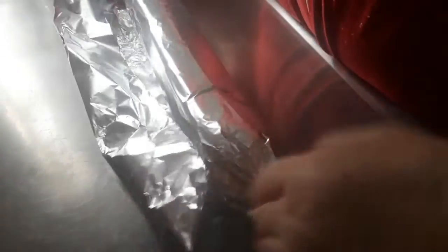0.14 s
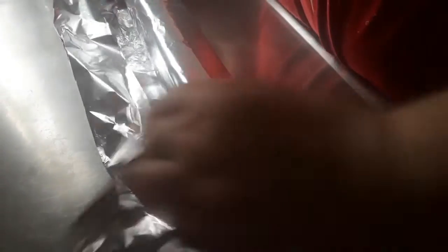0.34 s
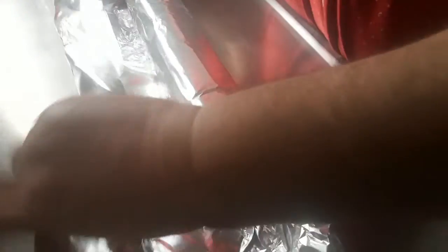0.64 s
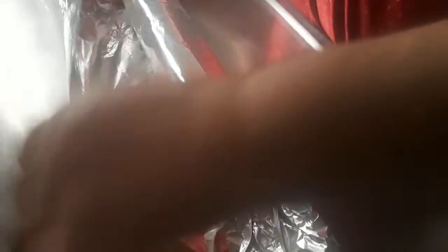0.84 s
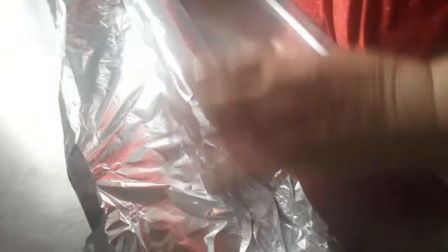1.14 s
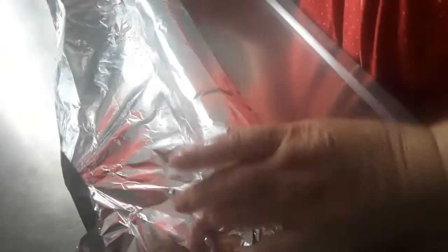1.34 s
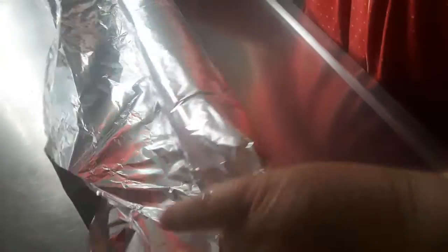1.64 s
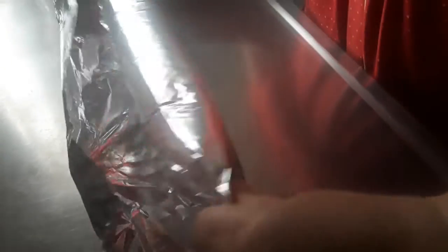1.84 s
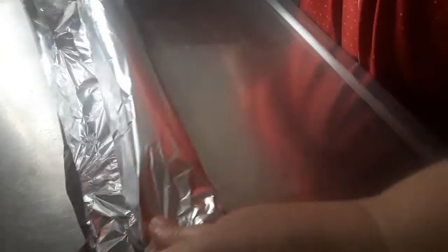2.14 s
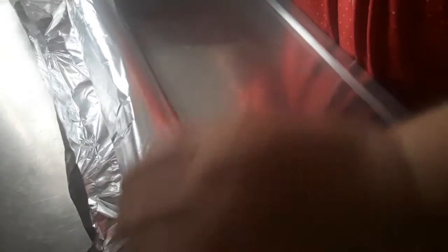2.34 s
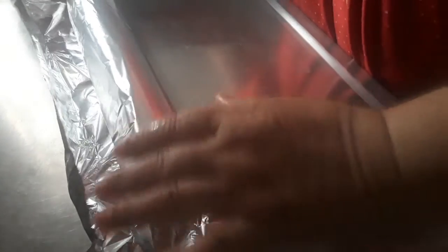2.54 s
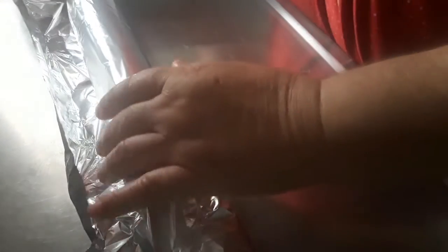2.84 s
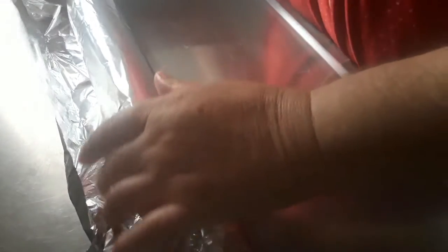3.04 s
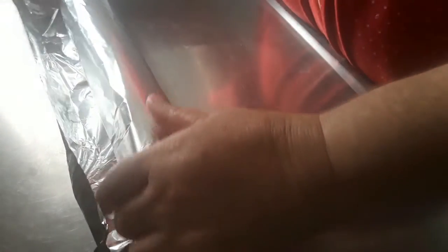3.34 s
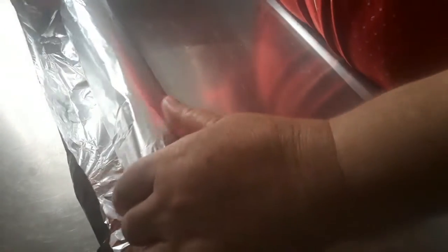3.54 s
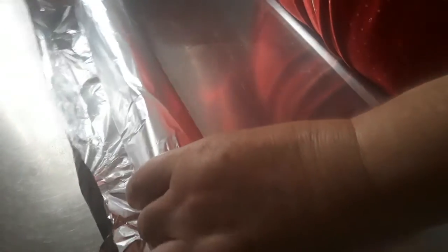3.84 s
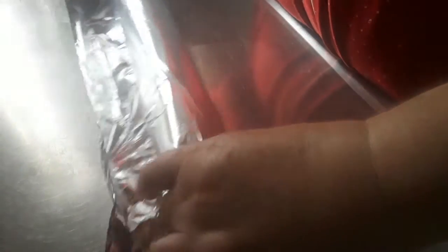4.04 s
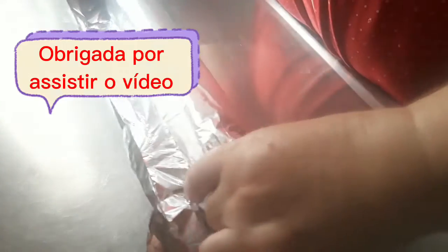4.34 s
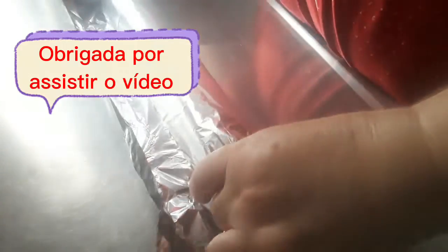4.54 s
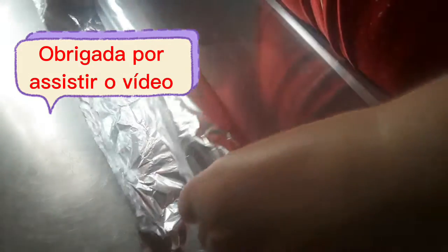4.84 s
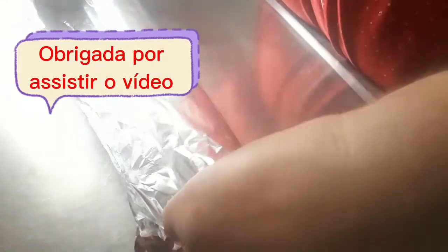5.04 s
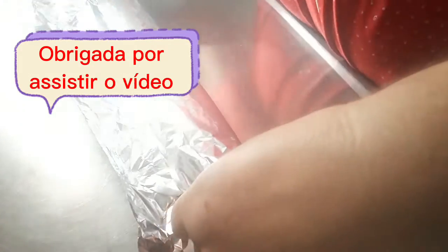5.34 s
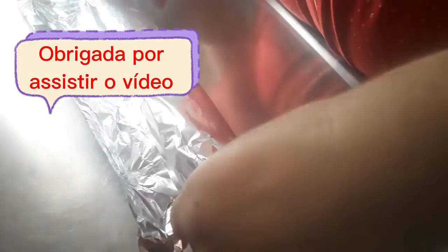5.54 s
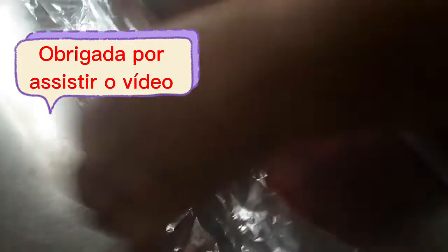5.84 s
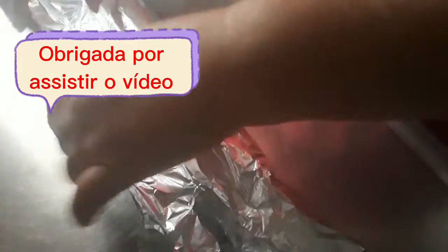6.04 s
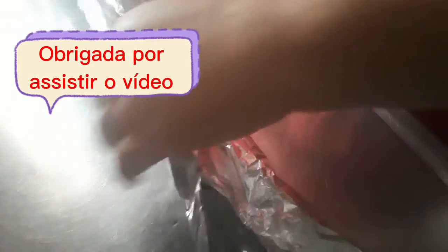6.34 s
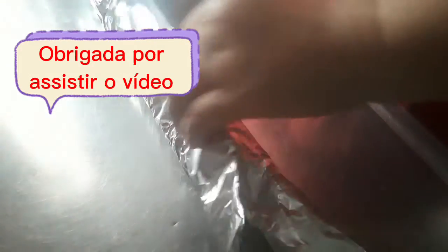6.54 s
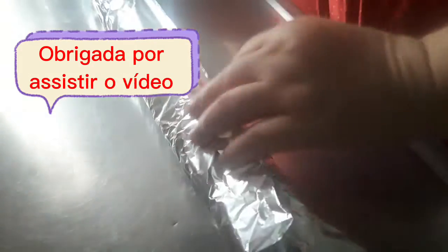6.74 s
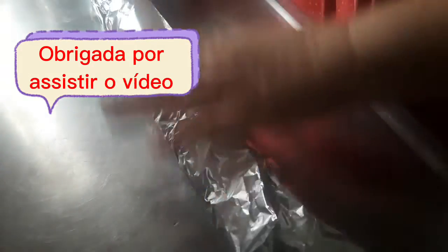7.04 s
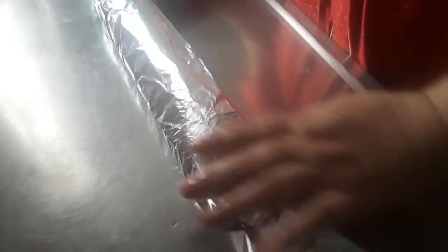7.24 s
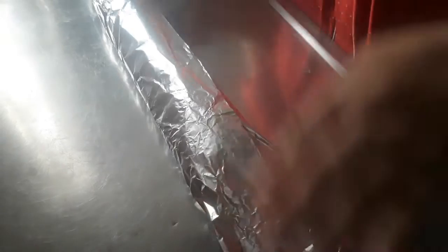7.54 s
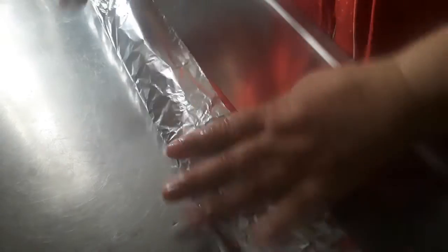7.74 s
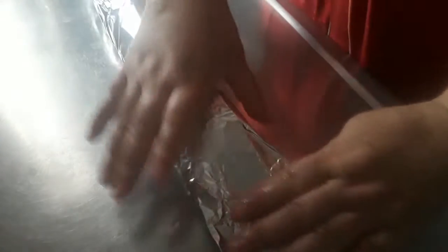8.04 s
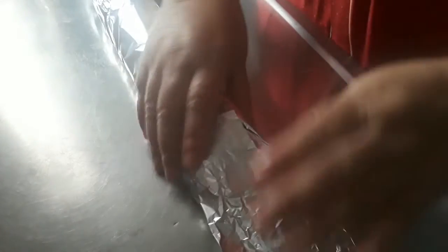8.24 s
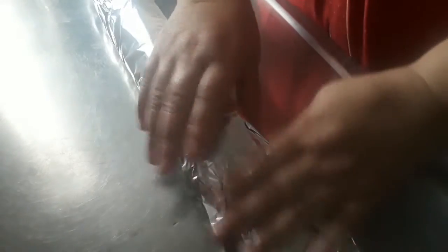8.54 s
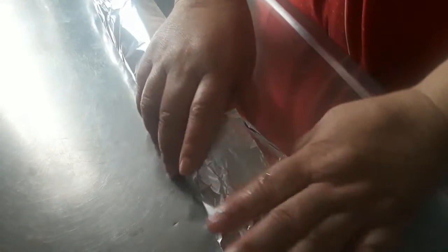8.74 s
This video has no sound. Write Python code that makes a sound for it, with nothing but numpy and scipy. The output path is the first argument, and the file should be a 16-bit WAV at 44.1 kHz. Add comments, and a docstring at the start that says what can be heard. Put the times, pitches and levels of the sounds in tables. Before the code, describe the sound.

Foil crinkles from the first moment, quickly bursting into loud, sharp crackle as creases collapse. Smaller, lower folding and pressing follows, with random tiny snaps and an occasional soft pat on the parcel. Later the crushing grows strong again, with thumps that make the metal counter ring briefly and short scraping rubs. Recorded close on a small microphone with little bass, in a small reflective kitchen with quiet room noise.

```python
"""Two hands fold and press aluminium foil around food on a steel kitchen counter, close by.
From the start, squeezes make tiny facets buckle in clumps over a faint hush, with lesser snaps at random.
Creases soon give way in bursts of small buckles, loudest in the first second and again in the second half.
From 0.4 s the palm pats the parcel, thudding into the ringing counter; from 2.8 s it also rubs the foil.
From 3.9 s a few chosen sharp snaps join in. The small kitchen briefly echoes every foil and hand sound."""
import sys
import numpy as np
from scipy import signal
from scipy.fft import rfft, irfft, next_fast_len
from scipy.io import wavfile
from scipy.ndimage import uniform_filter1d

SR = 44100
rng = np.random.default_rng(int(sys.argv[2]) if len(sys.argv) > 2 else 0)


def generate_wav(sig):
    """Save sig (samples, or channels by samples) to the path in sys.argv[1] as 16-bit PCM at SR."""
    pcm = np.round(np.clip(np.atleast_2d(sig).T, -1, 1) * 32767).astype(np.int16)
    wavfile.write(sys.argv[1], SR, pcm)


N = 392490
TIME = np.arange(N) / SR

# Levels in the tables are relative: each sound function also applies its own overall gain.
# Faint noise of the still room: (frequency [Hz], level [dB])
HUSH_COLOUR = [(25, 13), (60, 8), (150, 8), (400, 0.5), (1500, 2.5), (6000, 4), (10000, -11), (16000, -30)]
# Squeezes and strokes of the hands: (time [s], length [s], force [dB], change of force by the end [dB],
# pressing on the parcel [dB], fineness [dB]: low = broad folds, high = small wrinkles)
SQUEEZES = [(-.039, .25, -27.5, 1, -19, -2), (.258, .17, -23.5, 2, -22, -1), (.485, .14, -27, 6, -16, -3.5),
            (.653, .14, -21, 3, -17.5, 0), (.838, 0.23, -24.5, -7.5, -20.5, 0.5),
            (1.286, 0.065, -25.5, -0.5, -22, 1.5), (1.404, 0.45, -30, 5, -18.5, -1.5),
            (1.918, .15, -27.5, 6.5, -20.5, 0), (2.076, .24, -25.5, -2, -17.5, -2.5),
            (2.378, .13, -28.5, -6, -19, -2.5), (2.549, .15, -26, -6, -15, -5.5),
            (2.728, 0.33, -30, -3.5, -17, -3.5), (3.03, 0.29, -33.5, 6, -16.5, -1.5),
            (3.236, .33, -31, 2, -14, -4), (3.615, .36, -30, 3, -15, -5), (4.007, .15, -28.5, 5, -20, -1),
            (4.198, .22, -25.5, -0.5, -11.5, -4.5), (4.497, .36, -27, 2.5, -17, -1.5),
            (4.882, .28, -27, 2.5, -18, -2), (5.249, 0.33, -24.5, -10.5, -16.5, -2),
            (5.607, .32, -25.5, -10, -15, -1.5), (6.081, .15, -25, -1, -15, -3),
            (6.23, 0.32, -20, -7, -14.5, 1.5), (6.557, .43, -22, -7.5, -17, .5),
            (7.092, .33, -23, 0, -15, -1.5), (7.473, .06, -24.5, -5, -20, -1.5),
            (7.76, 0.026, -22.5, -1.5, -11, -2), (7.867, .31, -29.5, 1.5, -11.5, -2),
            (8.244, .16, -28, -4, -19.5, 2.5), (8.517, 0.27, -26, -6, -16.5, -1.5),
            (8.778, 0.11, -29, 3, -18, -2)]
# Colour of the foil's crackle: (frequency [Hz], level [dB])
FOIL_COLOUR = [(470, -45.5), (800, -5), (883, -14), (1400, -6.5), (1840, -6), (2730, -4.5), (4770, 0.5),
               (6510, -1.5), (7740, 1.5), (9920, -11), (14200, -3), (15500, -7.5)]
# Colour of the parcel and counter under the foil: (frequency [Hz], level [dB])
PARCEL_COLOUR = [(30, -14), (60, -37), (100, -10), (130, -17), (155, 0), (185, -18.5), (270, -9),
                 (420, 3.5), (630, -3), (725, 2.5), (850, -4), (1100, 4)]
# The sharpest single facets snapping through: (time [s], level [dB], pitch [Hz])
SNAPS = [(3.9344, -11, 2750), (4.007, -17, 7620), (4.212, -11.5, 5350), (5.3727, -14, 6050),
         (5.4068, -16, 5160), (5.47, -15.5, 5060), (7.714, -24, 7560), (8.4968, -19, 5030)]
# Large creases giving way: (time [s], level [dB], pitch of the largest facet [Hz])
CREASES = [(0.197, -7, 5000), (0.26, -6, 5270), (0.407, -1, 6700), (0.492, -4, 8200), (0.544, 0.5, 4300),
           (0.6, -4, 7600), (0.6904, -9, 5300), (0.767, -6, 7520), (0.796, 1.5, 7600), (0.822, 2.5, 7600),
           (1.062, -11.5, 4200), (1.225, -15, 6940), (1.259, -16.5, 7700), (1.318, -8, 4930),
           (1.501, -11, 4120), (1.609, -9.5, 7630), (1.885, -10, 5450), (2.417, -13.5, 2750),
           (2.612, -13, 4850), (2.734, -13.5, 6500), (2.755, -10.5, 2470), (2.904, -11.0, 4160),
           (3.079, -15.0, 2600), (3.138, -13.5, 6060), (3.19, -12, 5500), (3.293, -14, 2200),
           (3.372, -9, 4770), (3.4752, -11, 4940), (3.579, -16.5, 2110), (3.854, -10, 5540),
           (4.346, -11.5, 1500), (4.795, -5.5, 4500), (5.272, -11.5, 3180), (5.47, -12.5, 5030),
           (5.505, -10.5, 4930), (5.852, -6, 1900), (6.097, -12, 5340), (6.255, -5, 8200),
           (6.9085, -10.0, 4660), (7.089, -10.5, 7300), (7.124, -6.5, 4600), (7.163, -9.5, 1740),
           (7.63, -19.5, 4860), (7.657, -16.5, 3460), (7.769, -1.5, 7130), (7.89, -8.5, 8000),
           (8.01, -6.5, 5200), (8.231, -10.5, 6900), (8.317, -10.5, 7860), (8.786, -12.5, 5615),
           (8.856, -2.5, 5100)]
# The hand landing on the parcel: (time [s], level [dB], length of the push [s], pitch of the hollow [Hz])
PATS = [(.429, -27, 0.03, 424), (.719, -22, 0.011, 438), (.993, -32, 0.023, 200),
        (1.062, -31.5, 0.015, 216), (1.501, -31, 0.014, 160), (2.755, -31, 0.01, 432),
        (3.367, -28.5, .0054, 420), (4.234, -21, 0.0043, 720), (4.267, -21, .007, 600),
        (6.256, -22, .012, 430), (6.352, -22.5, 0.018, 424), (7.113, -23.5, 0.0048, 140),
        (7.312, -27.5, 0.01, 406), (7.783, -20.5, .013, 340), (8.555, -26.5, 0.0097, 322),
        (8.697, -39, 0.0071, 158), (8.852, -26, .016, 143)]
# Ringing of the counter: (frequency [Hz], level [dB], time to fade by 60 dB [s])
COUNTER_MODES = [(112, -20, 0.091), (157.7, 8, 0.29), (308, -4, 0.55), (427, 4, 0.12), (769, 10.5, 0.053)]
# The palm sliding over the foil: (time [s], length [s], level [dB], resonance of the air pocket [Hz])
RUBS = [(2.81, 0.077, -46.5, 1000), (4.225, 0.18, -44, 1420), (6.1, 0.082, -37, 1850),
        (7.118, 0.3, -37.5, 1630), (8.844, 0.064, -32, 1390)]
# How long the kitchen rings: (frequency [Hz], time to fade by 60 dB [s])
KITCHEN_FADE = [(200, 0.32), (530, 0.26), (1400, 0.3), (4000, 0.39), (10000, 0.18), (16000, 0.12)]


def amp(db):
    """Turns decibels into a gain."""
    return 10 ** (np.asarray(db) / 20)


def evened(x):
    """Scales a signal to an rms (average strength) of 1."""
    return x / np.sqrt(np.mean(x ** 2) + 1e-20)


def read(points, hz):
    """Reads a table between its points, on a log-frequency axis."""
    f, value = np.transpose(points)
    return np.interp(np.log(hz + 1), np.log(f), value)


def add(mix, s, sound):
    """Lays a sound into the mix at time s."""
    part = mix[max(round(s * SR), 0):][:len(sound)]
    part += sound[:len(part)]


def colour(x, points, size=4096):
    """Filters to the given spectrum without sounding early, so that clicks keep their sharp fronts."""
    log_gain = np.log(amp(read(points, abs(np.fft.fftfreq(size, 1 / SR)))))
    # this turns the wanted loudness curve into a minimum-phase filter
    taps = np.fft.ifft(np.exp(np.conj(signal.hilbert(log_gain)))).real
    return signal.oaconvolve(x, taps[:size // 2])[:len(x)]


def split(x, edges_hz, order=8):
    """Cuts a sound into adjoining bands, each at rms 1."""
    size = next_fast_len(N)
    spectrum, hz = rfft(x, size), np.fft.rfftfreq(size, 1 / SR)
    lowpasses = [1 / (1 + (hz / edge) ** order) for edge in edges_hz]
    below = [0 * hz] + lowpasses + [0 * hz + 1]
    return [evened(irfft(spectrum * band, size)[:N]) for band in np.diff(below, axis=0)]


def resonate(x, hz, q):
    """One broad resonance, as strong as the sound that drives it."""
    y = signal.lfilter(*signal.iirpeak(hz, q, SR), x)
    return y * np.linalg.norm(x) / np.linalg.norm(y)


def reshaped(x, patchy_db):
    """The sheet changes shape as it crumples, so its resonances keep shifting."""
    z = signal.stft(x, nperseg=256)[2]
    patches = uniform_filter1d(rng.standard_normal(z.shape), size=9, axis=0)  # smooth over pitch
    patches = uniform_filter1d(patches, size=5, axis=1)  # smooth over time
    return signal.istft(z * amp(patchy_db * evened(patches)), nperseg=256)[1][:len(x)]


def buckles(per_s, spread_db, ring_s, count=200, size=512):
    """A stream of facets snapping through, mostly small, each with its own brief jumble of tones."""
    fade = np.exp(-np.arange(size) / SR / ring_s)
    spectra = rfft(rng.standard_normal((count, size)) * fade, axis=1)
    # together the facets favour no pitch
    facets = irfft(spectra / np.sqrt(np.mean(abs(spectra) ** 2, 0)), axis=1)
    chance, strength = rng.random(N), rng.exponential(1, N)
    which, sign = rng.integers(0, count, N), rng.choice([-1, 1], N)
    out = np.zeros(N + size)
    for i in np.flatnonzero(chance < per_s / SR):
        out[i:i + size] += sign[i] * amp(spread_db * min(strength[i], 3)) * facets[which[i]]
    return evened(out[:N])


def hush():
    """The still room is steady noise, shaped to its own colour."""
    return amp(-49.5) * evened(colour(rng.standard_normal(N), HUSH_COLOUR))


def hands(attack_s=0.029, release_db_per_s=104.5):
    """Squeezes build, hold and let go; gives crush, pressing and fineness in dB, led by the strongest."""
    t = np.arange(0, N / SR + .002, .002)
    power = amp(-47) ** 2 + 0 * t  # foil at rest under the fingers
    press, fine = -30 * power, 0 * t  # pressing and fineness are summed weighted by power
    for s, length_s, force_db, change_db, press_db, fine_db in SQUEEZES:
        age = np.maximum(t - s, 0)
        closing = np.minimum(age / attack_s, 1)
        held_db = force_db + change_db * np.minimum(age / length_s, 1)
        release_db = release_db_per_s * np.maximum(age - length_s, 0)
        squeeze = (closing * amp(held_db - release_db)) ** 2
        power = power + squeeze
        press = press + press_db * squeeze
        fine = fine + fine_db * squeeze
    curves = (10 * np.log10(power), press / power, fine / power)
    return [np.interp(TIME, t, curve) for curve in curves]


def clumps(per_s, fade_s, steady):
    """One buckle sets off its neighbours: activity jumps, then fades."""
    kicks = (rng.random(N) < per_s / SR) * rng.uniform(0.45, 1, N) ** 2 / per_s
    power = signal.lfilter([1], [1, -np.exp(-1 / (SR * fade_s))], kicks)
    return np.sqrt(abs(steady) + power / power.mean())


def crinkle(crush_db, press_db, fine_db):
    """Running crackle: pressing sounds the parcel, broad folds clatter low, fine wrinkles fizz."""
    fold_db, wrinkle_db = -10.5 - fine_db, -1.5 + fine_db  # relative to the middle facets
    pace = amp(0.6 * (crush_db + 28))  # harder crushing buckles more facets a second, and more evenly
    activity = clumps(per_s=105 * pace, fade_s=0.0049, steady=0.36 * pace ** 2)
    stream = buckles(per_s=2800 * pace, spread_db=2.5, ring_s=0.0004) * activity
    stream = reshaped(stream, patchy_db=1.5)
    _, folds, facets, wrinkles = split(colour(stream, FOIL_COLOUR), [1000, 2800, 9000])
    counter, parcel, _ = split(colour(stream, PARCEL_COLOUR), [280, 1000])
    # the counter follows the pressing only weakly
    body = amp(press_db) * parcel + amp(0.2 * press_db - 22.5) * counter
    sheet = amp(fold_db) * folds + facets + amp(wrinkle_db) * wrinkles
    return amp(crush_db - 4.5) * (body + sheet)


def strays(crush_db, per_s=8, level_db=3, spread_db=2, pitch_hz=(2720, 7600)):
    """Lesser snaps at random moments, louder the harder the foil is crushed: rows like SNAPS."""
    rows = []
    for when, size, pitch in rng.random((int(per_s * N / SR), 3)):
        db = crush_db[int(when * N)] + level_db + spread_db * (2 * size - 1)
        rows.append((when * N / SR, db, np.interp(pitch, [0, 1], pitch_hz)))
    return rows


def snaps(crush_db, ring_s=0.0025, facet_db=-3.5, facet_q=9.1, trim_db=-6.5):
    """A lone facet flips: one sharp click with a moment of ring."""
    t, out = np.arange(SR // 40) / SR, np.zeros(N)
    for s, db, hz in SNAPS + strays(crush_db):
        click = colour(rng.standard_normal(len(t)) * np.exp(-t / ring_s), FOIL_COLOUR)
        click = click + amp(facet_db) * resonate(click, hz, facet_q)
        strength = np.sqrt(np.sum(click ** 2) / (SR * ring_s))
        add(out, s, amp(db + trim_db) * click / strength)
    return out


def creases(rise_s=0.0025, dying_s=0.011, facet_q=6.4, trim_db=-10.0):
    """A crease gives way: an avalanche of small buckles builds and dies, tinted by its largest facet."""
    avalanche = reshaped(buckles(per_s=5000, spread_db=1.5, ring_s=0.00037), patchy_db=0.5)
    avalanche = evened(colour(avalanche, FOIL_COLOUR))
    t, out = np.arange(SR // 6) / SR, np.zeros(N)
    swell = np.exp(-t / dying_s) * (1 - np.exp(-t / rise_s))
    for s, db, hz in CREASES:
        at = rng.integers(N - len(t))
        burst = avalanche[at:at + len(t)] * swell
        burst *= np.linalg.norm(swell) / np.linalg.norm(burst)  # the burst holds a set amount of energy
        ring_db = -10 + 5 * np.log2(5000 / hz)  # broad, low facets ring out more: 5 dB an octave
        add(out, s, amp(db + trim_db) * (burst + amp(ring_db) * resonate(burst, hz, facet_q)))
    return out


def pats(trim_db=-12.0, ring_db=-18.5, hollow_q=2.7, flat_share=0.46):
    """The palm's soft, uneven push thuds in the hollow of the parcel and rings the counter."""
    t, out = np.arange(SR // 2) / SR, np.zeros(N)
    ring = sum(amp(db - 60 * t / t60) * np.sin(2 * np.pi * hz * t) for hz, db, t60 in COUNTER_MODES)
    ring = ring / np.linalg.norm(ring)
    flesh = signal.butter(3, [75, 800], "band", fs=SR, output="sos")
    for s, db, push_s, hz in PATS:
        u = t / push_s
        push = signal.sosfilt(flesh, rng.standard_normal(len(t)) * np.sqrt(u) * np.exp(-u))
        blow = resonate(push, hz, hollow_q) + flat_share * push
        thud = blow + amp(ring_db) * signal.fftconvolve(blow, ring)[:len(t)]
        peak = np.sqrt(uniform_filter1d(thud ** 2, size=800).max())  # strength of the loudest 18 ms
        add(out, s, amp(db + trim_db) * thud / peak)
    return out


def rubs(rise_s=0.011, fall_s=0.015, pocket_q=4.1, scrape_db=3.0):
    """A sliding palm flips facets in a dense, even stream that excites the air pocket under the foil."""
    scrape = colour(buckles(per_s=7000, spread_db=6, ring_s=0.0004), FOIL_COLOUR)
    out = np.zeros(N)
    for s, length_s, db, hz in RUBS:
        t = np.arange(0, length_s + 5 * fall_s, 1 / SR)
        drive = evened(scrape[rng.integers(N - len(t)):][:len(t)])
        pocket = resonate(resonate(drive, hz, pocket_q / 2), hz, pocket_q / 2)
        slide = np.minimum(t / rise_s, 1) * np.exp(-np.maximum(t - length_s, 0) / fall_s)
        add(out, s, amp(db) * slide * (pocket + amp(scrape_db) * drive))
    return out


def echoes(near_db=-5.0, near_s=0.0068, tail_db=-8.0):
    """Quick reflections off counter and hands, then the short tail of a hard little room."""
    t = np.arange(SR // 3) / SR
    taps = rng.choice([-1., 1.], len(t)) * (rng.random(len(t)) < 4000 / SR)  # about 4000 echoes a second
    near = taps * (t > .001) * np.exp(-t / near_s)
    hz, at, z = signal.stft(rng.standard_normal(len(t)) * (t > .008), SR, nperseg=256)
    fade = amp(-60 * at / read(KITCHEN_FADE, hz)[:, None])  # each pitch fades at its own rate
    tail = signal.istft(z * fade, SR, nperseg=256)[1][:len(t)]
    return amp(near_db) * near / np.linalg.norm(near) + amp(tail_db) * tail / np.linalg.norm(tail)


def kitchen(x, count=12, size=400):
    """Buckles come from all over the sheet, and each spot has its own echoes."""
    spot = np.repeat(rng.integers(0, count, N // size + 1), size)[:N]  # a random spot every 9 ms
    out = x
    for k in range(count):
        share = np.sqrt(abs(uniform_filter1d(1. * (spot == k), size=128)))  # spots blend at their edges
        out = out + signal.oaconvolve(x * share, echoes())[:N]
    return out


def scene():
    """Crackle, snaps, creases, pats and rubs in the kitchen, over its faint hush."""
    crush_db, press_db, fine_db = hands()
    foil = crinkle(crush_db, press_db, fine_db) + snaps(crush_db) + creases() + rubs()
    return (kitchen(foil + pats()) + hush())[None]


def record(dry):
    """The small microphone loses deep bass and rounds off the highest peaks; then the top is cut."""
    bass_cut = signal.butter(2, 55, "high", fs=SR, output="sos")
    heard = np.tanh(signal.sosfilt(bass_cut, dry))
    top_cut = signal.firwin(511, 15750, window=("kaiser", 9), fs=SR)  # cutoff in Hz
    return signal.oaconvolve(heard, top_cut[None], "same")


dry = scene()
out = record(dry)
generate_wav(out)
```